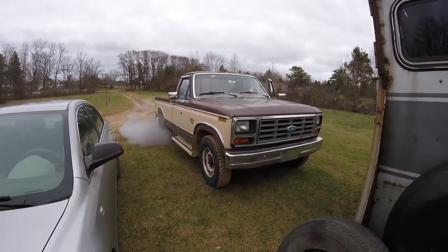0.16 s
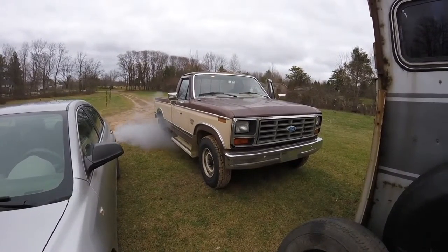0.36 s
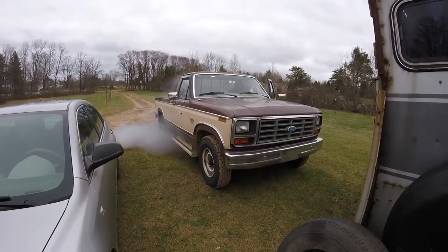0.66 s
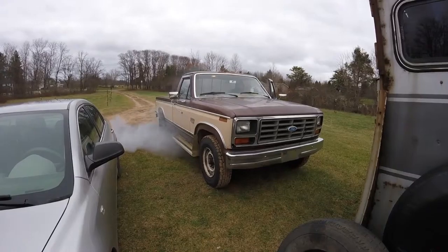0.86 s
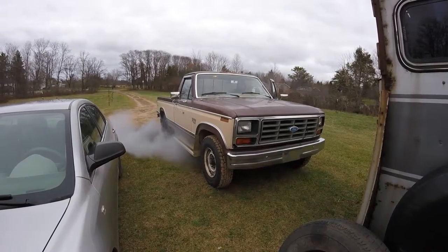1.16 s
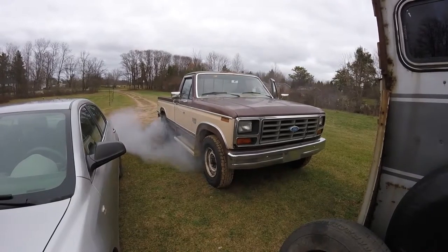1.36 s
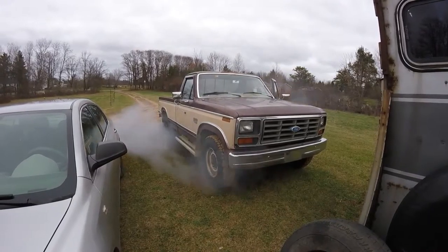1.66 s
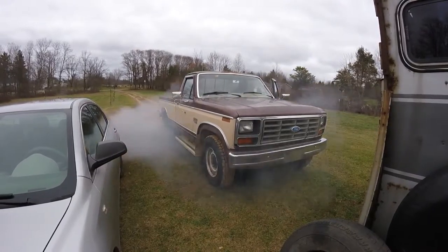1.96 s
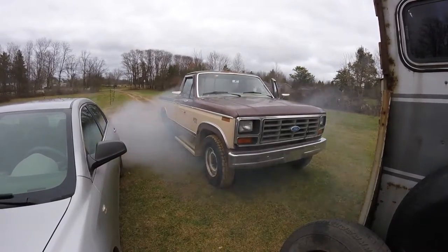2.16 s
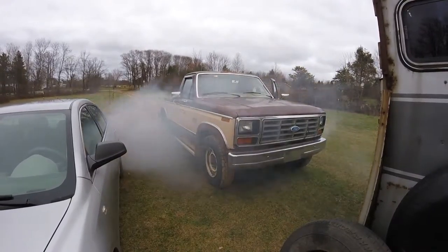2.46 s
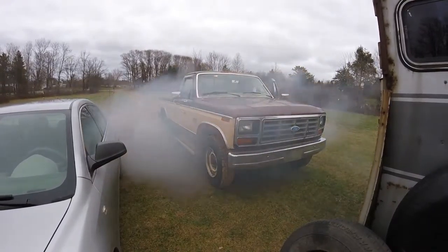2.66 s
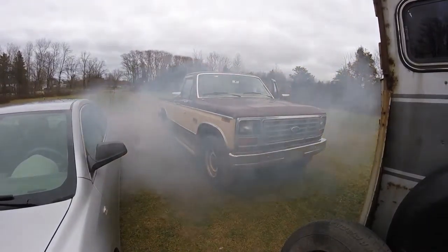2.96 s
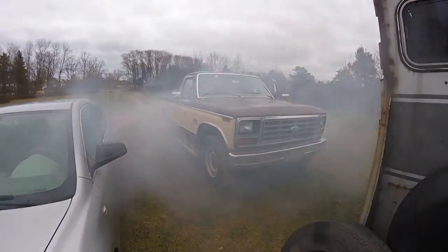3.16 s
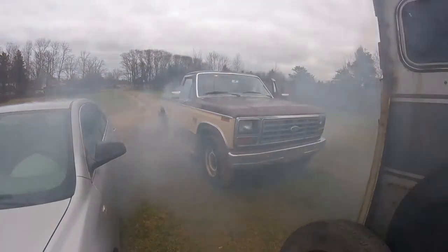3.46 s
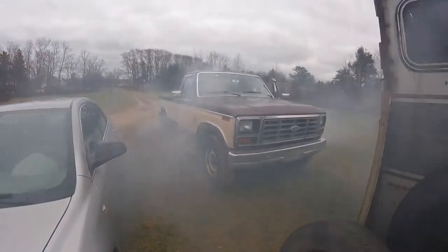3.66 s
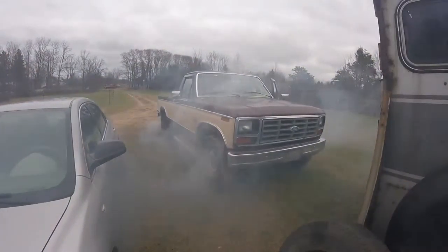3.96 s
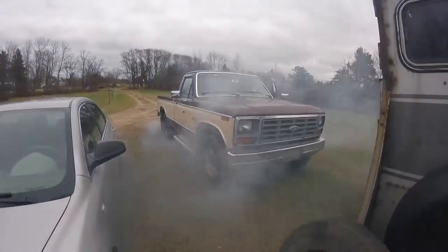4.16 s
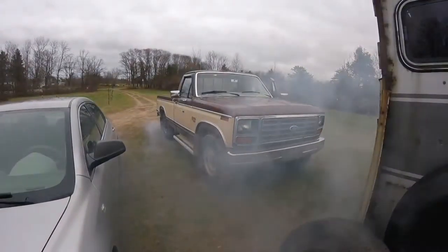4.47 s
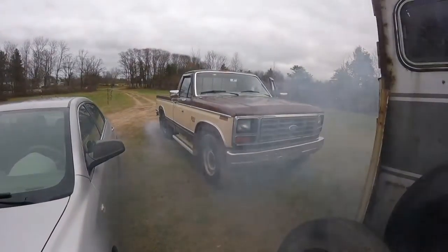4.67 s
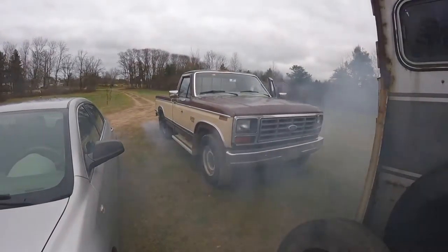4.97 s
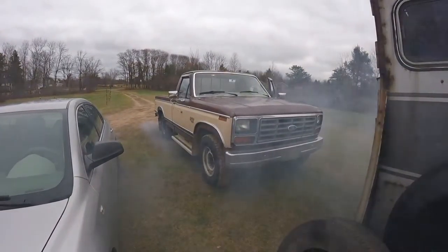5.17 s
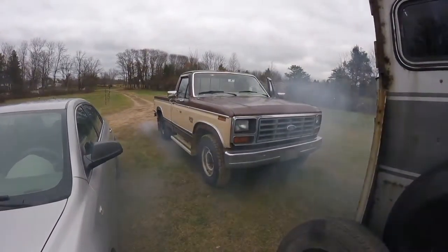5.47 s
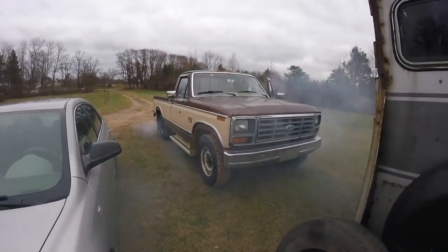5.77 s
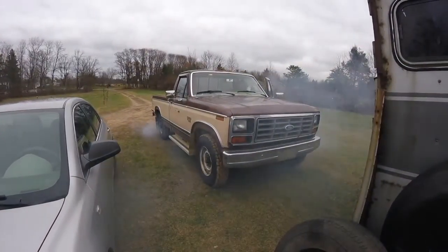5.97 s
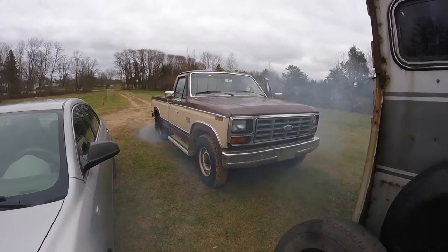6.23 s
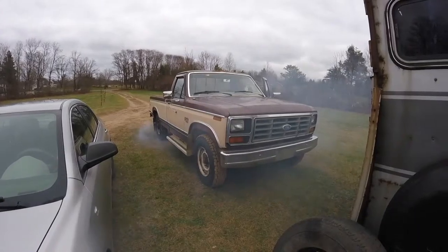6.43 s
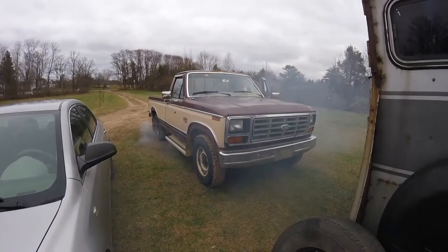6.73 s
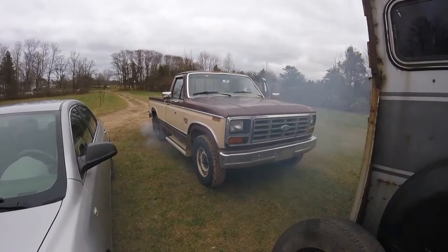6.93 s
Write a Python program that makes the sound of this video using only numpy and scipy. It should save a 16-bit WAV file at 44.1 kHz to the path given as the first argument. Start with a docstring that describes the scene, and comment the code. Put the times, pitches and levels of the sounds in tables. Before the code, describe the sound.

Outdoors, a rough diesel engine surges twice with a swelling fan hum, almost dies between, then drops to steady, knocking idle as wind bumps the microphone.

```python
"""A cold diesel V8 in a pickup on a lawn, microphone a few metres off: it catches and races.
The starter's gear clatters in this first rush; the fan's hum swells, then the engine all but stalls.
It coughs, races again with a second swell of the fan, sags and settles to idle as gusts come and go.
Each firing knocks the block and rattles the tin covers, every cylinder in its own voice; the exhaust drones
on the firing rate, the valve train churns on while the engine coasts, and wind bumps the microphone."""
import sys
import numpy as np
from scipy import signal
from scipy.fft import rfft, irfft, next_fast_len
from scipy.io import wavfile
from scipy.ndimage import uniform_filter1d

SR = 44100
rng = np.random.default_rng(int(sys.argv[2]) if len(sys.argv) > 2 else 0)


def dump(signal):
    """Clip the signal to [-1, 1] and save it as 16-bit WAV at the path in sys.argv[1]."""
    limited = np.clip(np.atleast_2d(signal).T, -1, 1)
    pcm = np.round(limited * 32767).astype(np.int16)
    wavfile.write(sys.argv[1], SR, pcm)


N = 313110

TIME = np.arange(N) / SR
SIZE = next_fast_len(N + SR // 2, real=True) // 2 * 2
FREQ = np.maximum(np.arange(SIZE // 2 + 1) * SR / SIZE, 1)
# time and frequency grids of a single blow
BLOW_S = TIME[:4096]
BLOW_FREQ = np.maximum(np.fft.rfftfreq(2 * len(BLOW_S), 1 / SR), 1)

# microphone: faint hiss, its colour [f/Hz, level/dB], and the upper limit
HISS_DB, TOP_HZ = -65, 12500
HISS_COLOUR = [(2000, 10.0), (6800, 7.5), (8000, -3), (12000, -4.5)]

# wind at the microphone: steady breeze, and colour of its rumble [f/Hz, level/dB]
BREEZE_DB = -40.5
RUMBLE_COLOUR = [(4, -12.0), (14, -43.5), (24, -11.5), (45, -15.5), (90, -23.5), (300, -71.0), (900, -100)]
# gusts that swell the rumble [t/s, level/dB, half length/s]
GUSTS = [(2.467, -29, 0.14), (2.8, -23.5, 0.21), (3.28, -19.5, 0.2), (3.68, -20, 0.093),
         (4.95, -26.5, 0.29), (5.35, -28, 0.074), (6.05, -24.5, 0.1), (6.85, -22.5, 0.17)]
# wind bumps on the microphone [t/s, peak level/dB, period of the swing/s]
BUFFETS = [(3.815, -7, 0.034), (4.811, -8.5, 0.023), (4.907, -11, 0.034), (4.989, -12, 0.042),
           (5.916, -9.5, 0.034), (6.045, -20, 0.027), (6.643, -12, 0.021)]

# cooling fan on its slipping clutch, lagging behind the engine [t/s, blade rate f/Hz, hum level/dB]
FAN = [(0, 112, -40), (.3, 148, -33), (.55, 173.2, -44), (.64, 184.5, -29), (.73, 195.2, -26.5),
       (.81, 200.6, -30.5), (.93, 191.2, -27), (1, 165, -30), (1.1, 141, -31), (1.2, 112.3, -34.5),
       (1.36, 80, -46), (1.9, 105, -39.5), (2.3, 138, -38), (2.42, 148, -29), (2.55, 160, -27),
       (2.72, 169.9, -27), (2.87, 161, -23), (3, 147, -26), (3.12, 139, -31.5), (3.22, 124.1, -35),
       (3.6, 119.9, -32.5), (3.8, 91.4, -46), (7.1, 69, -45)]
FAN_OCTAVE_DB, FAN_WAVER_DB = -7, 1.5  # second harmonic against the first; unsteadiness

# the starter's gear clatters on while the engine runs ahead of it [start t/s, end t/s, level/dB]
STARTER = [(0.232, 0.279, -30), (0.403, 0.552, -35.5), (0.565, 0.574, -28.5), (0.607, 0.713, -32)]
# ringing of the starter [f/Hz, width/Hz, relative level/dB]
STARTER_RING = [(2250, 200, 2.5), (2570, 220, 3), (3380, 560, -9), (5300, 1800, -15.5),
                (10900, 3800, -34.5)]

# engine speed [t/s, firing rate f/Hz]
SPEED = [(0, 66), (.14, 86), (.21, 83), (.33, 91), (.38, 92), (.46, 110), (.6, 116), (.73, 129), (.82, 118),
         (.92, 99), (1, 85), (1.27, 45), (1.39, 25), (1.47, 48), (1.56, 55), (1.74, 43), (1.82, 62),
         (1.91, 88), (2.02, 72), (2.23, 86), (2.4, 90), (2.58, 94), (2.87, 85), (3, 79), (3.1, 72),
         (3.25, 55), (3.45, 71), (3.58, 63), (3.77, 37), (3.85, 40.3), (4.85, 40.6), (5.1, 41.1), (6, 41.2),
         (6.5, 41.7), (7.1, 42)]
IDLE_HZ = 41
FIRST_CYLINDER_S = 5.421  # the firing count is zero here, on the first cylinder

# valve train and timing gears [f/Hz, relative level/dB]
CHURN_COLOUR = [(45, -2), (90, 3), (130, 2), (170, -1), (200, 0.5), (235, 0), (300, -3), (340, -3),
                (380, 2.5), (420, -3.5), (495, -4), (545, -3), (700, -3.5), (1100, -13), (2000, -59),
                (9000, -84)]
# churn at idle speed: from speed alone, and at full load, where it eases with speed
CHURN_DB, CHURN_DB_PER_OCTAVE, LUG_DB, LUG_DB_PER_OCTAVE = -30, 4.5, -21.5, -1.5
FULL_LOAD_DB, LOAD_SPAN_S = -14, 0.095  # blow level that counts as full load; span it is averaged over

# the tailpipe coughs as the engine picks up from a near stall [t/s, level/dB, half length/s]
COUGHS = [(1.445, -26, 0.042), (1.8, -22, 0.015)]
# exhaust by engine speed [firing rate f/Hz, its level/dB, level/dB at twice and at three times that rate]
EXHAUST = [(28, -25.5, -38, -46), (41, -24.5, -35, -38), (51.3, -29, -36, -38), (62, -35.5, -35.5, -47),
           (74, -30.5, -41, -43.5), (85.6, -29, -40.5, -41.5), (93, -33.5, -37.5, -44),
           (128, -26, -42, -50)]
FIRING_LOAD_DB = 2.5  # full load deepens the drone
PIPE_HZ, PIPE_WIDTH_HZ = 356, 42  # resonance of the tailpipe
BARK_LOAD_DB = -10  # full load holds the bark back against the churn
# the growl's overtones [multiple of the firing rate]
GROWL_ORDERS = [2.25, 2.5, 2.75, 3.25, 3.5, 3.75, 4.25, 4.5]
# each overtone against the churn when racing, its change at full load, and its gathering round the pipe
GROWL_DB, GROWL_LOAD_DB, GROWL_WIDTH_HZ = -12, -12, 200

# cylinders in firing order, each with its own voice [knock level/dB, rattle level/dB (both relative),
# lateness/firing intervals, slap delay/s, relative slap level/dB, knock tone f/Hz, rattle tone f/Hz,
# rattle tone lift/dB]
CYLINDERS = [(0.5, 2, .09, .011, -0.5, 1800, 4400, 2.5), (2, -1.5, .1, 0.012, -6, 460, 4300, 4.5),
             (1.5, 2, .1, 0.0065, -1.5, 600, 900, 0), (3, 0.5, .11, .007, -1, 940, 4100, 6),
             (1.5, -0.5, .21, 0.0082, 1, 990, 5200, 7), (-1.5, 1, .03, 0.0042, -8, 690, 3400, 2.5),
             (3, -1, .05, .007, -3, 760, 2100, 0.5), (-4, -8.5, .08, 0.0058, -6.5, 240, 2940, 9)]
IDLE_SCATTER_DB, RACING_SCATTER_DB = 1.53, 2.5  # chance spread of the firings' strength
# spells in which the fuel burns, the last two at idle
# [start t/s, end t/s, knock level/dB, rattle level/dB, change over the spell/dB]
BURNS = [(-0.02, 0.139, -21.5, -40.5, 1.5), (0.208, 0.318, -16.5, -36.5, -3),
         (0.378, 0.709, -22, -39.5, 0.5), (1.408, 1.555, -25, -56, -7), (1.733, 1.939, -13.5, -40, -8.5),
         (2.021, 2.226, -19, -39, 1), (2.28, 2.63, -19.5, -38, -4), (2.64, 3.264, -22, -40.5, -5.5),
         (3.275, 3.562, -16.5, -35, -7.5), (3.871, 4.825, -21, -41.5, 1.5), (4.855, 7.304, -19, -37.5, -1)]
CATCH_S, DIE_S = 0.02, 0.031  # combustion sets in and dies away
# compression alone, at idle speed: knock and injector clicks
COAST_KNOCK_DB, COAST_KNOCK_DB_PER_OCTAVE = -33.5, 3.5
COAST_CLICK_DB, COAST_CLICK_DB_PER_OCTAVE = -58.5, 5.5
# cylinders that fire hard [t/s, knock peak level/dB, rattle level/dB (both ahead of the two offsets # below),
# pitch the block rings at f/Hz]
HARD_FIRINGS = [(0.041, -2.5, -34, 791), (0.065, -3, -28, 820), (0.101, -2.5, -30, 950),
                (0.212, -1, -26, 940), (0.271, -11, -35, 940), (0.324, -9, -30, 924),
                (0.394, -5, -29.5, 880), (0.464, -4, -36, 910), (0.545, -7.5, -29, 940),
                (0.569, -8, -31, 930), (0.616, -4, -35, 950), (1.366, -16.5, -41, 925),
                (1.407, -16, -36, 970), (1.436, -9, -30.5, 820), (1.446, -8, -37, 950),
                (1.463, -9.5, -29.5, 986), (1.487, -4.5, -34, 930), (1.528, -4.5, -35.5, 850),
                (1.576, -14, -39.5, 899), (1.633, -15, -34.5, 910), (1.745, -6.5, -29.5, 894),
                (1.777, -4.5, -29, 977), (1.807, -5, -29.5, 910), (1.827, -3.5, -35, 980),
                (1.935, -4.5, -28, 870), (2.014, -6.5, -31, 942), (2.025, -6, -23, 938),
                (2.07, -9.5, -31, 965), (2.098, -5, -33, 854), (2.204, -5.5, -26, 890),
                (2.367, -14, -27.5, 829), (2.488, -6, -28.5, 995), (2.847, -3.5, -30, 996),
                (3.271, -7, -24, 786), (3.314, -4.5, -29, 980), (3.348, -4.5, -34, 986),
                (3.421, -4, -24.5, 946), (3.44, -6.5, -28, 955), (3.777, -20, -46, 908),
                (3.793, -12.5, -41, 962), (3.85, -9.5, -32.5, 974), (3.903, -4, -24.5, 900),
                (3.926, -3.5, -36, 960), (3.999, -4, -30, 958), (4.048, -9, -32, 960),
                (4.191, -8, -31.5, 940), (4.323, -2.5, -29.5, 946), (4.346, -6, -29, 980),
                (4.392, -6.5, -30.5, 970), (4.514, -7, -31, 955), (4.586, -6.5, -29, 958),
                (4.714, -4, -27, 946), (4.74, -4.5, -29, 945), (4.787, -4, -28, 946),
                (4.912, -2.5, -27.5, 958), (4.984, -8, -28, 970), (5.107, -3, -27, 939),
                (5.139, -5.5, -30, 950), (5.18, -5.5, -28.5, 980), (5.226, -10.5, -27.5, 974),
                (5.278, -7, -31, 947), (5.302, -2, -24.5, 954), (5.376, -4, -27, 934),
                (5.471, -5.5, -29.5, 920), (5.521, -7, -34, 960), (5.568, -4.5, -26, 926),
                (5.614, -9.5, -26, 977), (5.688, -5.5, -30, 950), (5.716, -4.5, -33, 1006),
                (5.763, -6.5, -29.5, 915), (5.885, -5, -28, 974), (5.911, -3.5, -31, 963),
                (5.956, -3.5, -25, 934), (6.081, -3, -25, 900), (6.105, -3.5, -32, 950),
                (6.154, -5, -25, 970), (6.465, -5.5, -25, 974), (6.493, -2.5, -27.5, 960),
                (6.516, -5.5, -31, 921), (6.541, -4.5, -24.5, 956), (6.631, -5.5, -33, 950),
                (6.845, -5.5, -28, 955), (6.919, -6, -26.5, 955), (7.038, -5.5, -26.5, 970),
                (7.062, -5.5, -34, 970)]
HARD_KNOCK_DB, HARD_RATTLE_DB = -8.5, -5  # offsets from those levels to the mean level of a firing

# ringing of rocker covers and injector lines [f/Hz, width/Hz, relative level/dB]
COVERS = [(1440, 90, 5.5), (1736, 150, 4), (1770, 45, -2), (1980, 43, -6.5), (2074, 43, 6), (2096, 15, 1.5),
          (2262, 67, 0.5), (2210, 360, -5), (2040, 550, 3.5), (2529, 44, 2.5), (2617, 130, -1),
          (3410, 580, -9), (3565, 270, -10), (5197, 100, -17.5), (4040, 340, -15.5), (4820, 510, -23.5),
          (5340, 1300, -22.5), (6410, 900, -22), (9250, 890, -38), (11100, 740, -50)]
# ringing of the covers when the engine races [f/Hz, width/Hz, relative level/dB]
RACING_COVERS = [(1290, 690, -1), (2360, 640, 0.5), (3420, 630, -6.5), (5070, 1200, -14), (6530, 840, -16),
                 (10300, 5800, -33.5)]
RATTLE_TONE_WIDTH_HZ = 620
INJECTION_LEAD_S = .003  # the injector clicks just before the fuel ignites
# soft rustle of the covers: level at idle speed, growth with speed, fall of the treble
WASH_DB, WASH_DB_PER_OCTAVE, WASH_TOP_HZ = -51.5, 4, 6000

# engine body, ringing [f/Hz, width/Hz, relative level/dB]
BLOCK = [(541.7, 27, -12.5), (716, 170, -17), (788, 112, -7), (822.6, 59, -6), (885, 24, -1.5),
         (945, 102, -1), (1010, 56, -21.5), (1180, 49, -17), (1285, 120, -19.5), (1430, 180, -30)]
BLOCK_CHATTER_S = 0.025
KNOCK_TONE_DB, KNOCK_TONE_WIDTH_HZ = 5, 170
HARD_TONE_DB, HARD_TONE_WIDTH_HZ = 5, 90  # a hard firing rings out at one pitch
HARD_CRACK_DB, SOFT_CRACK_DB, HARD_SLAP_DB = 6, 0, -4  # first impact; change of slap when hard


def undb(db):
    """Decibels to gain."""
    return 10 ** (np.asarray(db) / 20)


def curves(rows):
    """Each column of a table as a value per sample."""
    s, *columns = np.transpose(rows)
    return [np.interp(TIME, s, column) for column in columns]


def loudness(x, span_s):
    """Rms over a sliding span."""
    count = max(int(span_s * SR), 2)
    power = uniform_filter1d(uniform_filter1d(x ** 2, count), count)
    return np.sqrt(np.maximum(power, 0) + 1e-18)


def steady(x, span_s):
    """Scale to rms near 1 over a sliding span, leaving the faster pulses as they are."""
    return x / loudness(x, span_s)


def colour(x, gain):
    """Causal filter with the given gain per frequency: it rings after a blow, never before."""
    cepstrum = irfft(np.log(gain + 1e-6))
    size = cepstrum.shape[-1]
    # fold the cepstrum onto positive time: minimum phase
    cepstrum[..., 1:size // 2] *= 2
    cepstrum[..., size // 2 + 1:] = 0
    return irfft(rfft(x, size) * np.exp(rfft(cepstrum)))[..., :x.shape[-1]]


def resonances(modes, freq=FREQ):
    """Gain of a body with steep-sided resonances."""
    power = 0
    for hz, width, db in modes:
        detune = (freq / hz - hz / freq) * hz / width
        power = power + (undb(db) / (1 + detune ** 2)) ** 2
    return np.sqrt(power)


def spectrum(points):
    """Gain through (Hz, dB) points."""
    hz, db = np.transpose(points)
    return undb(np.interp(np.log(FREQ), np.log(hz), db))


def tone(hz, width_hz, db):
    """Gain that lifts one band of a blow."""
    return undb(db / (1 + (2 * (BLOW_FREQ - hz) / width_hz) ** 2))


def walk(rate):
    """Slow chance with a spread of 1."""
    count = int(SR / rate)
    steps = np.repeat(rng.standard_normal(N // count + 1), count)
    smooth = uniform_filter1d(uniform_filter1d(steps, count), count)[:N]
    return smooth / smooth.std()


def swells(rows):
    """Summed power of bell-shaped swells, given as (s, dB, half length s)."""
    return sum((undb(db) * np.exp(-((TIME - s) / half) ** 2 / 2)) ** 2 for s, db, half in rows)


def blows(times, sizes):
    """A train of single impulses; size 1 gives rms 1 at idle speed."""
    places = np.clip(times * SR, 0, N - 1).astype(int)
    return np.bincount(places, sizes, N) * np.sqrt(SR / IDLE_HZ)


def chatter(hits, decay_s, grit_db):
    """Each blow sets loose parts chattering: a dying shower of tiny impacts with the blow's energy."""
    keep = np.exp(-2 / (decay_s * SR))
    power = signal.lfilter([1 - keep], [1, -keep], hits ** 2)
    grit = undb(grit_db * np.repeat(rng.standard_normal(N // 32 + 1), 32)[:N])
    return np.sqrt(power) * rng.standard_normal(N) * grit / np.sqrt(np.mean(grit ** 2))


def burst(rise_s, decay_s, delay_s=0):
    """Power over time of one impact, with a total of 1."""
    t = np.maximum(BLOW_S - delay_s, 0)
    power = (np.exp(-t / decay_s) * (1 - np.exp(-t / rise_s))) ** 2
    return power / power.sum(axis=-1, keepdims=True)


def strike(times, sizes, cylinder, power, gain, likeness, grit_db, crack=0):
    """Each blow is a shower of tiny impacts into a body; a cylinder repeats much of its own shower."""
    count, likeness = len(BLOW_S), np.clip(likeness, 0, 1)
    own = rng.standard_normal((len(CYLINDERS), count))[cylinder]
    fresh, grit = rng.standard_normal((len(times), 2, count)).transpose(1, 0, 2)
    grit = undb(grit_db * np.repeat(grit[:, ::32], 32, axis=1))
    impacts = np.sqrt(likeness) * own + np.sqrt(1 - likeness) * fresh * grit / grit.std()
    shower = np.sqrt(power) * impacts
    shower[:, 0] += crack
    sound = colour(shower, gain)
    # every blow carries exactly the energy of its size
    sound = sound * (sizes * np.sqrt(SR / IDLE_HZ) / np.linalg.norm(sound, axis=1))[:, None]
    places = np.maximum(times * SR, 0).astype(int)[:, None] + np.arange(count)
    return np.bincount(places.ravel(), sound.ravel(), N)[:N]


def microphone_hiss():
    """Coloured noise of the microphone itself."""
    return undb(HISS_DB) * colour(rng.standard_normal(N), spectrum(HISS_COLOUR))


def wind():
    """A low rumble at the microphone that swells in gusts, with swings of pressure as eddies pass."""
    rumble = colour(rng.standard_normal(N), spectrum(RUMBLE_COLOUR))
    power = undb(BREEZE_DB) ** 2 + swells(GUSTS)
    out = steady(rumble, span_s=0.19) * np.sqrt(power)
    for s, db, length in BUFFETS:
        u = (TIME - s) / length
        out = out - undb(db) * np.cos(2 * np.pi * u) * np.exp(-(2 * u) ** 2)
    return out


def fan():
    """The fan's blades hum on their passing rate and its octave."""
    hz, db = curves(FAN)
    angle = 2 * np.pi * np.cumsum(hz) / SR
    hum = 0
    for k, part_db in ((1, 0.0039), (2, FAN_OCTAVE_DB)):
        hum = hum + undb(db + part_db + FAN_WAVER_DB * walk(12)) * np.sin(k * angle)
    return np.sqrt(2) * hum


def starter(kicks):
    """Kicks of the crankshaft rattle the starter's gear in short spells until it drops out."""
    gate = 0
    for start, end, db in STARTER:
        onset = np.clip((TIME - start) / 0.009, 0, 1)
        gate = gate + undb(db) * onset * np.exp(-np.maximum(TIME - end, 0) / 0.01)
    clatter = colour(chatter(kicks, decay_s=0.021, grit_db=3.5), resonances(STARTER_RING))
    return gate * steady(clatter, span_s=0.069)


def churn(hits, turn):
    """Valve train and gears throb dully without fuel too; part repeats with every camshaft turn."""
    cam = rng.standard_normal(size=512)
    repeating = np.interp(turn / len(CYLINDERS), np.arange(len(cam)) / len(cam), cam, period=1)
    lash = steady(chatter(hits, decay_s=.02, grit_db=2.5), span_s=.2)
    loose = lash + undb(1) * rng.standard_normal(N)
    body = spectrum(CHURN_COLOUR)
    throb = steady(colour(repeating, body), span_s=0.25) + steady(colour(loose, body), span_s=0.22)
    return steady(throb, span_s=.06)


def coughs():
    """A slug of gas makes the tailpipe hoot: noise through one narrow resonance."""
    hoot = colour(rng.standard_normal(N), resonances([(346, 47, 0.0033)]))
    return steady(hoot, span_s=0.023) * np.sqrt(swells(COUGHS))


def exhaust(turn, hz, load, churning, waver_db, bark_db):
    """The tailpipe drones on the firing rate and overtones; two uneven banks add a growl between them."""
    rates, *columns = np.transpose(EXHAUST)
    firing_db, double_db, triple_db = (np.interp(hz, rates, column) for column in columns)
    tones = [(1, firing_db + FIRING_LOAD_DB * load), (2, double_db), (3, triple_db)]
    orders = [(k, undb(db + waver_db * walk(10))) for k, db in tones]
    racing = np.clip(hz / IDLE_HZ - 1, 0, 1)
    growl = racing * churning * undb(GROWL_DB + GROWL_LOAD_DB * load)
    for k in GROWL_ORDERS:
        off_tune = (k * hz - PIPE_HZ) / (GROWL_WIDTH_HZ / 2)
        orders.append((k, growl * walk(12) / (1 + off_tune ** 2)))
    # higher overtones bark while they cross the pipe's resonance
    for k, db in ((3, -5), (4, -2), (5, -2)):
        off_tune = (k * hz - PIPE_HZ) / (PIPE_WIDTH_HZ / 2)
        orders.append((k, churning * undb(bark_db + db + BARK_LOAD_DB * load) / (1 + off_tune ** 2)))
    return np.sqrt(2) * sum(gain * np.sin(2 * np.pi * k * turn) for k, gain in orders)


def firings(turn, racing, jitter_s):
    """Times, cylinders and strengths of the eight in firing order, more ragged in strength when racing."""
    count = np.arange(np.ceil(turn[0]), turn[-1])
    cylinder = count.astype(int) % len(CYLINDERS)
    knock_db, rattle_db, late, *_ = np.array(CYLINDERS)[cylinder].T
    chance = rng.standard_normal((len(count), 3)).T
    times = np.interp(count + late, turn, TIME) + jitter_s * chance[0]
    speed = np.interp(times, TIME, racing)
    scatter_db = IDLE_SCATTER_DB + (RACING_SCATTER_DB - IDLE_SCATTER_DB) * speed
    knocks = undb(knock_db + scatter_db * chance[1])
    # a rattle shares half its chance with the knock
    rattles = undb(rattle_db + scatter_db * (chance[1] + chance[2]) / np.sqrt(2))
    return times, cylinder, knocks, rattles


def combustion():
    """Strength of knock and rattle from the burning fuel: each spell catches, drifts in level and dies."""
    knocking, rattling = 0, 0
    for start, end, knock_db, rattle_db, change_db in BURNS:
        gate = np.clip((TIME - start) / CATCH_S, 0, 1) * np.exp(-np.maximum(TIME - end, 0) / DIE_S)
        burn = gate * undb(change_db * np.clip((TIME - start) / (end - start), 0, 1))
        knocking = knocking + burn * undb(knock_db)
        rattling = rattling + burn * undb(rattle_db)
    return knocking, rattling


def strokes(octaves, times, cylinder, knocks, rattles):
    """All blows (time, cylinder, knock, rattle, hard, pitch): faint from compression, loud with fuel."""
    knocking, rattling, octaves = (np.interp(times, TIME, c) for c in (*combustion(), octaves))
    coast_knock = undb(COAST_KNOCK_DB + COAST_KNOCK_DB_PER_OCTAVE * octaves)
    coast_click = undb(COAST_CLICK_DB + COAST_CLICK_DB_PER_OCTAVE * octaves)
    knocks = np.hypot(knocks * knocking, coast_knock)
    rattles = np.hypot(rattles * rattling, coast_click)
    hard_s, peak_db, rattle_db, ring_hz = np.transpose(HARD_FIRINGS)
    # a hard firing takes the place of the ordinary one
    apart = np.abs(times[:, None] - hard_s)
    plain = apart.min(axis=1) > .011
    own_hz = np.array(CYLINDERS)[cylinder, 5]
    ordinary = times, cylinder, knocks * plain, rattles * plain, np.zeros(len(times)), own_hz
    hard_knocks, hard_rattles = undb(peak_db + HARD_KNOCK_DB), undb(rattle_db + HARD_RATTLE_DB)
    nearest = cylinder[apart.argmin(axis=0)]
    hard = hard_s, nearest, hard_knocks, hard_rattles, np.ones(len(hard_s)), ring_hz
    return [np.concatenate(pair) for pair in zip(ordinary, hard)]


def wash(octaves):
    """The covers never fall quite still: a soft rustle that follows the speed."""
    ring = np.hypot(resonances(RACING_COVERS), undb(-13.5) * resonances(COVERS))
    rustle = colour(rng.standard_normal(N), ring / np.hypot(1, FREQ / WASH_TOP_HZ))
    return rustle / rustle.std() * undb(WASH_DB + WASH_DB_PER_OCTAVE * octaves)


def rattle(times, cylinder, sizes, racing):
    """Injectors and rockers clang through the tin covers, whose ringing shifts as the engine races."""
    tone_hz, tone_db = np.array(CYLINDERS)[cylinder].T[-2:, :, None]
    speed = np.interp(times, TIME, racing)[:, None]
    idle_ring = resonances(COVERS, BLOW_FREQ) * (1 - 0.25 * speed)
    covers = np.hypot(idle_ring, resonances(RACING_COVERS, BLOW_FREQ) * speed)
    power = burst(rise_s=.0027, decay_s=.0125) + undb(-6) ** 2 * burst(rise_s=.001, decay_s=.026)
    gain = covers * tone(tone_hz, RATTLE_TONE_WIDTH_HZ, tone_db)
    return strike(times, sizes, cylinder, power, gain, likeness=0.89, grit_db=3.5)


def knock(times, cylinder, sizes, hard, tone_hz):
    """Combustion cracks at the block, the piston slaps the bore later; hard firings crack harder."""
    slap_s, slap_db = np.array(CYLINDERS)[cylinder].T[3:5, :, None]
    crack = undb(np.where(hard, HARD_CRACK_DB, SOFT_CRACK_DB))
    hard, tone_hz = hard[:, None], tone_hz[:, None]
    slap_power = undb(slap_db + HARD_SLAP_DB * hard) ** 2
    slap = burst(rise_s=0.00027, decay_s=0.0028, delay_s=slap_s) * slap_power
    shudder = burst(rise_s=.0007, decay_s=BLOCK_CHATTER_S) * undb(0.8) ** 2
    width_hz = np.where(hard, HARD_TONE_WIDTH_HZ, KNOCK_TONE_WIDTH_HZ)
    ring = tone(tone_hz, width_hz, np.where(hard, HARD_TONE_DB, KNOCK_TONE_DB))
    gain = resonances(BLOCK, BLOW_FREQ) * ring
    return strike(times, sizes, cylinder, slap + shudder, gain, likeness=0.61, grit_db=3, crack=crack)


def scene():
    """One crankshaft times the engine's blows and drone; the fan and the wind keep their own course."""
    hz, = curves(SPEED)
    octaves = np.log2(hz / IDLE_HZ)
    racing = np.clip((hz - 42) / 28, 0, 1)
    turn = np.cumsum(hz) / SR  # counted in firings
    turn = turn - np.interp(FIRST_CYLINDER_S, TIME, turn)
    times, cylinder, knocks, rattles = firings(turn, racing, jitter_s=.0003)
    kicks = blows(times, knocks)  # the crankshaft's kicks, with or without fuel
    times, cylinder, knocks, rattles, hard, tone_hz = strokes(octaves, times, cylinder, knocks, rattles)
    load = loudness(blows(times, knocks), LOAD_SPAN_S) / undb(FULL_LOAD_DB)
    lugging = load * undb(LUG_DB + LUG_DB_PER_OCTAVE * octaves)
    churning = np.hypot(undb(CHURN_DB + CHURN_DB_PER_OCTAVE * octaves), lugging)

    background = microphone_hiss() + wind() + fan() + starter(kicks)
    valves = churning * churn(kicks, turn)
    pipe = coughs() + exhaust(turn, hz, np.minimum(load, 1), churning, waver_db=1.2, bark_db=-3.5)
    covers = wash(octaves) + rattle(times - INJECTION_LEAD_S, cylinder, rattles, racing)
    block = knock(times, cylinder, knocks, hard, tone_hz)
    return (background + valves + pipe + covers + block)[None]


def record(dry):
    """The microphone's chain rounds the loudest peaks and cuts the top."""
    ceiling = 1.13
    rounded = ceiling * np.tanh(dry / ceiling)
    low_pass = signal.ellip(10, .2, 80, TOP_HZ, fs=SR, output="sos")
    return signal.sosfilt(low_pass, rounded, axis=-1)


dry = scene()
out = record(dry)
dump(out)
```